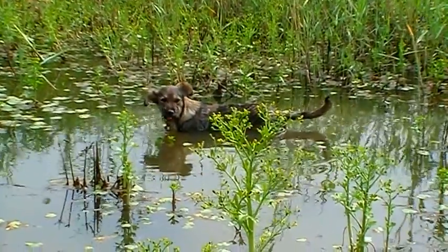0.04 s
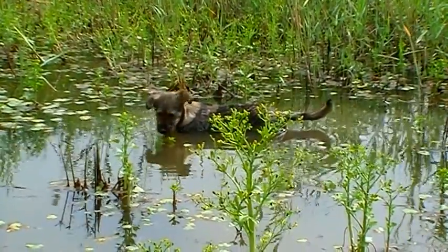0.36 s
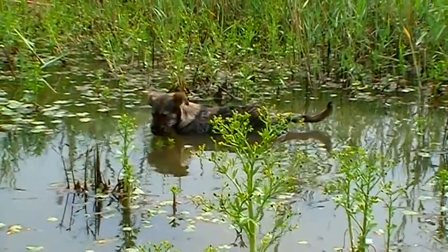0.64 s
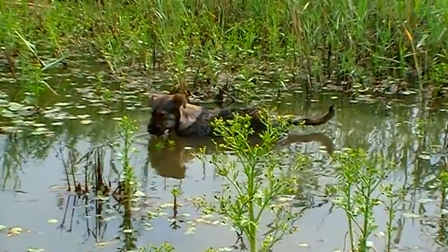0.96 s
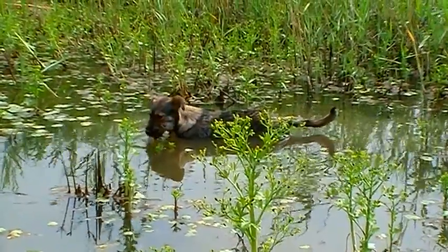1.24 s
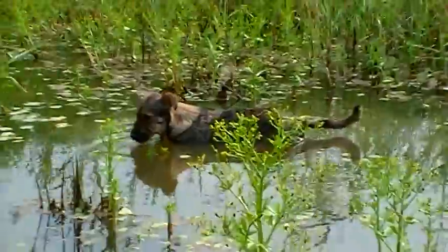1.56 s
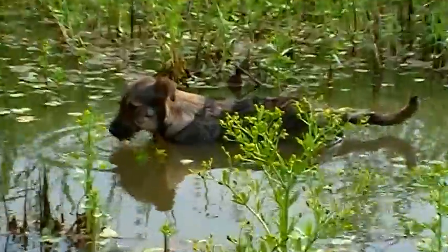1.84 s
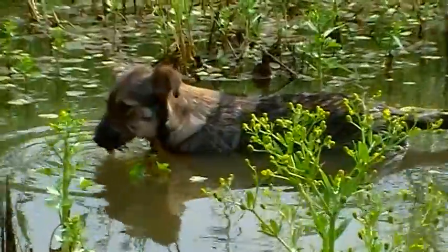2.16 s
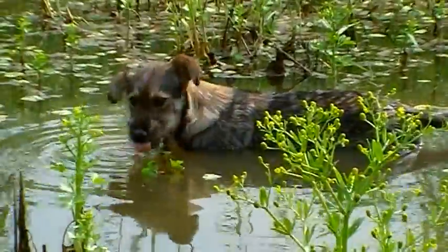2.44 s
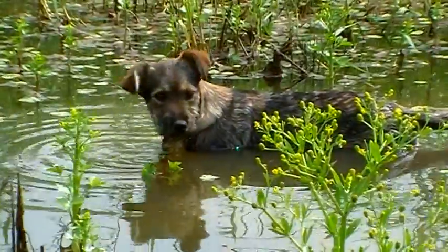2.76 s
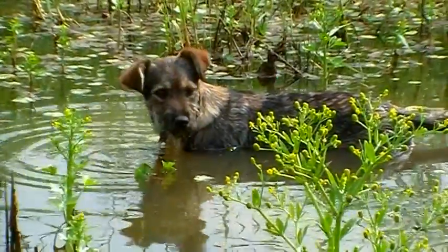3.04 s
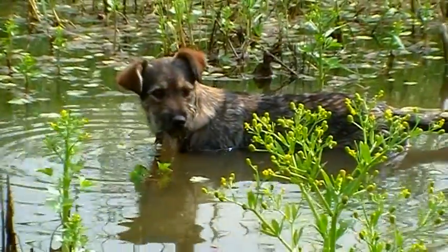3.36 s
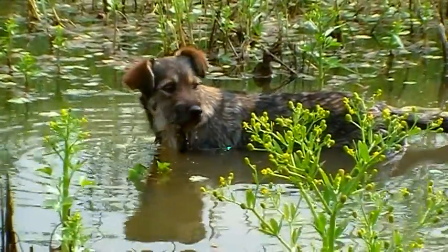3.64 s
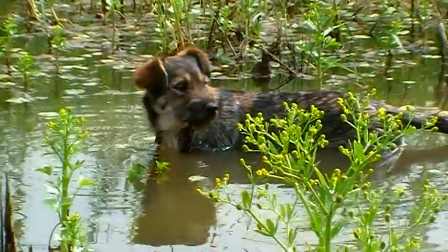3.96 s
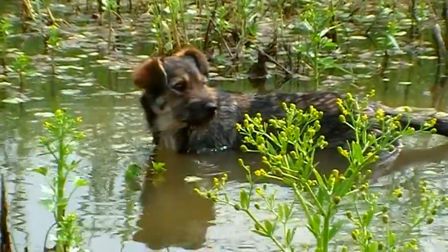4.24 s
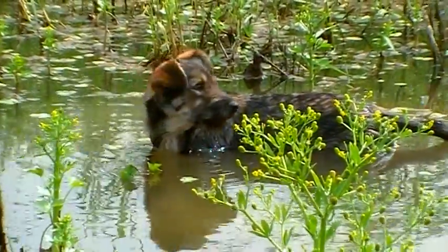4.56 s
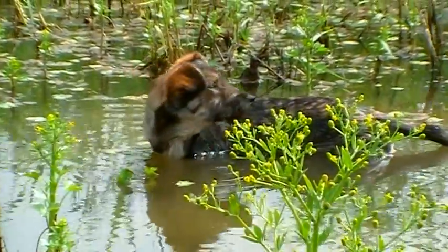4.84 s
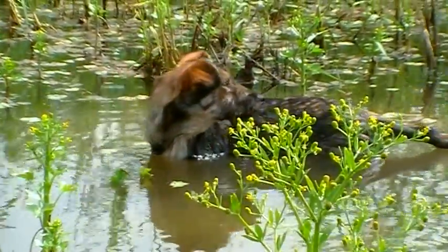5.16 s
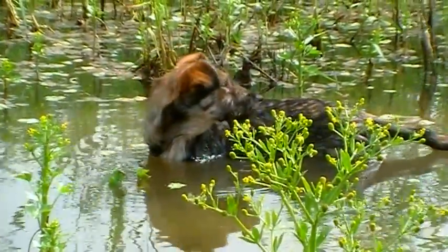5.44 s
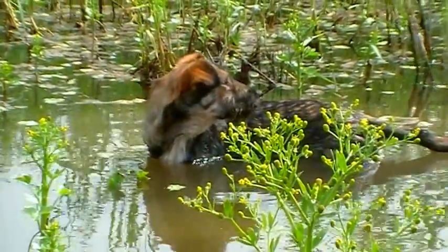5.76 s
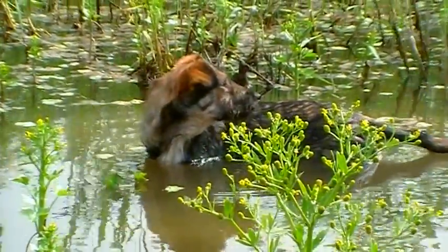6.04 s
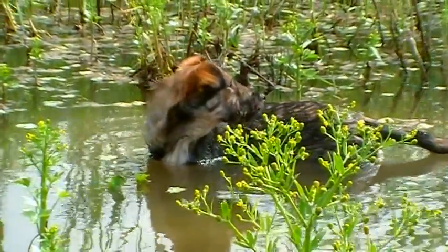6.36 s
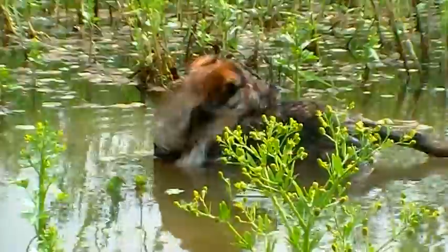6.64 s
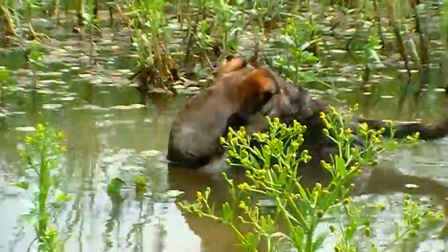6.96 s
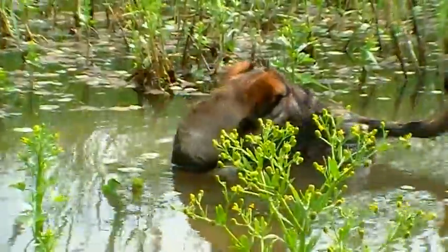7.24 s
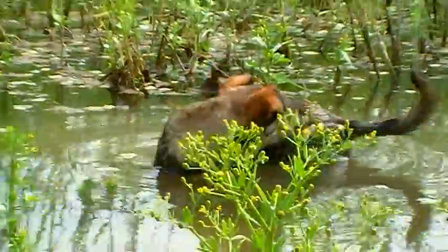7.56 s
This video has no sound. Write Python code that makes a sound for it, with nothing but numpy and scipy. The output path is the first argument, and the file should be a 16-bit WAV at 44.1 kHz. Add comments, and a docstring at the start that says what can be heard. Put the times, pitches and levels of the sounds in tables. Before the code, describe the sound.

Outdoors by a marsh, a songbird chatters in short phrases over a constant hiss. It starts with scratchy rasps, moves to high whistles and a quick run of chips, then returns to rasping and churring. Early on, gentle wind bumps the microphone and there is one dry click. Later a distant low drone and a soft rustle creep in behind the bird.

```python
"""In the reeds of a marsh a warbler sings: grating rasps, whistles, chips and a soft stutter, mostly in pairs.
Membranes in its syrinx modulate the airflow, its throat filters the tone, and the stems scatter it.
Behind it lies a steady hiss; toward the end a low drone and a soft rustle come up.
Light puffs of air press on the microphone, and the camera clicks once."""
import sys
import numpy as np
from scipy import signal
from scipy.fft import rfft, irfft
from scipy.io import wavfile
from scipy.ndimage import uniform_filter1d

SR = 44100
rng = np.random.default_rng(int(sys.argv[2]) if len(sys.argv) > 2 else 0)


def dump(signal):
    """Clip the signal to [-1, 1] and save it as 16-bit WAV at the path in sys.argv[1]."""
    limited = np.clip(np.atleast_2d(signal).T, -1, 1)
    pcm = np.round(limited * 32767).astype(np.int16)
    wavfile.write(sys.argv[1], SR, pcm)


N = 339570
TIME, BINS = np.arange(N) / SR, np.fft.rfftfreq(N, 1 / SR)


def amp(db):
    """Amplitude ratio of a level in decibels."""
    return 10 ** (np.asarray(db) / 20)


def unit(x):
    """Normalisation to rms 1."""
    return x / np.sqrt(np.mean(x ** 2) + 1e-20)


def at_frequency(points, hz=BINS):
    """Interpolation on a logarithmic frequency axis."""
    f, value = np.transpose(points)
    return np.interp(np.log(hz + 1), np.log(f + 1), value)


def envelope(curve):
    """Amplitude envelope, linear in decibels between breakpoints."""
    return amp(np.interp(TIME, *np.transpose(curve)))


def gaussian(x, centre, width):
    """Gaussian pulse of height 1."""
    return np.exp(-((x - centre) / width) ** 2)


def wander(rate_hz):
    """Random modulation: low-pass noise of rms 1."""
    return unit(irfft(rfft(rng.standard_normal(N)) * gaussian(BINS, 0, rate_hz), N))


def correlated(left, independent, coherence):
    """Partial coherence: the right channel is part left channel, part independent signal."""
    return coherence * left + np.sqrt(1 - coherence ** 2) * independent


def noise(spectrum, coherence, lead_rad=0):
    """Spectral shaping of two partly coherent channels of white noise."""
    left, independent = rfft(rng.standard_normal((2, N)))
    right = correlated(left, independent, coherence) * np.exp(-1j * lead_rad)
    return unit(irfft(np.array([left, right]) * amp(at_frequency(spectrum)), N))


# Spectrum of the hiss: f/Hz, relative level/dB
HISS_SPECTRUM = [(15, -52), (28, -28), (55, -9), (99, -5.5), (183, -6), (566, -8.5), (848, -3.5), (970, -5),
                 (1570, -6), (1710, -4), (2700, -6), (3930, -5), (4490, -9), (7490, -4.5), (11500, -16.5),
                 (15500, -39)]
# The hiss eases and partly returns: t/s, relative level/dB
HISS_ENVELOPE = [(2.5, -58.7), (4.2, -60.6), (5.3, -60.6), (5.8, -59.7)]
# Likeness of the channels: f/Hz, signed coherence
HISS_COHERENCE = [(60, -0.71), (130, -0.46), (290, -0.24), (640, -0.012), (1400, 0.75), (3100, 0.74),
                  (6800, 0.82), (9500, 0.29), (15000, 0.31)]
# Lead of the left channel: f/Hz, phase/rad
HISS_LEAD = [(300, -0.097), (700, -0.43), (3000, 0.23), (7500, 0.032), (9200, 0.69), (11500, 1.9),
             (15000, -0.12)]


def hiss(gain_db=12, flicker_db=0.75):
    """Broadband noise whose coherence depends on frequency; its level flickers slightly."""
    band = noise(HISS_SPECTRUM, at_frequency(HISS_COHERENCE), at_frequency(HISS_LEAD))
    return band * envelope(HISS_ENVELOPE) * amp(gain_db + flicker_db * wander(27))


# Spectrum of the drone: f/Hz, relative level/dB
DRONE_SPECTRUM = [(25, -65), (80, -17), (130, -8), (200, -1), (300, -0.5), (450, -8.5), (700, -9.5),
                  (1500, -45)]
# The drone creeps in, rises and holds: t/s, level/dB
DRONE_ENVELOPE = [(0, -75.5), (4.95, -64), (5.9, -55.5)]


def drone():
    """Low-frequency noise, nearly coherent in the two channels, heard as a distant drone."""
    return noise(DRONE_SPECTRUM, coherence=0.94) * envelope(DRONE_ENVELOPE)


# Spectrum of the rustle: f/Hz, relative level/dB
RUSTLE_SPECTRUM = [(30, -70), (400, -28), (800, -4), (1300, -1), (2200, -1.5), (3100, -3), (4000, -17.5),
                   (8000, -11), (14000, -40)]
# Its two swells: t/s, rise/dB, half width/s
RUSTLE_SWELLS = [(6.2, 4.5, 0.54), (7.32, 5, 0.12)]


def rustle(start_db=-58, growth_db_per_s=1.12, flicker_db=0.88):
    """Amplitude-modulated mid-band noise: a rustle that grows slowly and swells twice."""
    band = noise(RUSTLE_SPECTRUM, coherence=0.88)
    swells_db = sum(db * gaussian(TIME, s, width) for s, db, width in RUSTLE_SWELLS)
    return band * amp(start_db + growth_db_per_s * TIME + swells_db + flicker_db * wander(25))


# Pressure spectrum of the eddies: f/Hz, relative level/dB
PUFF_SPECTRUM = [(25, -32), (70, -8.5), (130, 1.5), (230, -3.5), (330, -4), (600, -29), (1500, -55)]
# The stronger puffs: t/s, relative level/dB, duration/s
PUFFS = [(0.008, -46.5, 0.066), (0.193, -44.5, 0.07), (0.315, -52, .042), (0.366, -49, 0.085),
         (.586, -55, .1), (2.299, -46, 0.062), (2.365, -49.5, 0.087), (3.338, -53, 0.076),
         (3.4, -45, 0.036), (3.727, -49.5, 0.3), (3.837, -51, 0.035)]


def puffs(gain_db=1, spacing_s=0.55, calm_at_s=4.8, faint_db=-62, faint_length_s=0.14):
    """Turbulent pressure: eddies thump the two microphone ports, largely in antiphase."""
    push, turbulence = np.zeros(N), noise(PUFF_SPECTRUM, coherence=-0.83)
    slots = np.arange(0, calm_at_s, spacing_s)
    faint_eddies = [(s + spacing_s * rng.random(), faint_db, faint_length_s) for s in slots]
    for s, db, length in PUFFS + faint_eddies:
        start, swell = round(s * SR), unit(np.hanning(int(length * SR)))
        push[start:start + len(swell)] += amp(db + gain_db) * swell
    return push * turbulence


# Spectrum of the tick: f/Hz, relative level/dB
CLICK_SPECTRUM = [(150, -42), (450, -6), (750, -4), (1050, 3.5), (1380, -2), (1750, -17), (2700, -6),
                  (3500, -17), (4900, -1.5), (7900, -6), (9400, -13), (15000, -46.5)]


def camera_click(at_s=2.0302, half_width_s=0.0014, db=-25):
    """A broadband transient: one dry tick on the camera body."""
    burst = amp(db) / np.sqrt(1 + ((TIME - at_s) / half_width_s) ** 4)
    return burst * noise(CLICK_SPECTRUM, coherence=0.2)


def scattered(sound, t60_s, coherence, count):
    """Scattering: many stems return echoes at random delays, with exponential decay."""
    delay = rng.uniform(0.002, t60_s, (2, count))
    echoes = rng.choice([-1., 1.], delay.shape) * amp(-60 * delay / t60_s)
    response = np.zeros((2, N))
    np.put_along_axis(response, (delay * SR).astype(int), echoes, axis=1)
    response /= np.linalg.norm(response, axis=1, keepdims=True)
    response[1] = correlated(response[0], response[1], coherence)
    return signal.fftconvolve(sound[None], response[:, :SR], axes=1)[:, :N]


def syrinx(hz, slope_db, fundamental_db):
    """Harmonic series of four partials; the throat favours the second, which sounds at hz."""
    phase = np.pi * np.cumsum(hz) / SR
    gains = amp([fundamental_db, 0, slope_db, 2 * slope_db])
    return np.sqrt(2) * sum(gain * np.sin(k * phase) for k, gain in enumerate(gains, 1))


def rattle(rate_hz, jitter, decay_cycles, uneven_db):
    """Pulse modulation: the membranes open in uneven, rounded pulses, each dying before the next."""
    cycles = np.cumsum(rate_hz * np.exp(jitter * wander(120.3))) / SR
    pulses = np.exp(-(cycles % 1) / decay_cycles)
    rounded = uniform_filter1d(pulses, size=int(0.33 * SR / rate_hz))
    return unit(rounded * amp(uneven_db * wander(70)))


def airflow_catches(rate_hz=58, width_cycles=0.21, depth=0.96, jitter=0.16, uneven_db=1.5):
    """Gating: the airflow catches for a moment between groups of three or four pulses."""
    cycles = np.cumsum(rate_hz * np.exp(jitter * wander(40.5))) / SR
    gate = 1 - depth * gaussian(cycles % 1, 0.5, width_cycles)
    return gate * amp(uneven_db * wander(38))


# One short falling note; columns as for the syllables below
PIP = [(.001, 0.007, 2190, 1790, -41, .06, -13.5)]
# Even runs of pips: t/s, duration/s, spacing/s, mid-run pitch factor, mid-run gain/dB
STUTTERS = [(0.372, .07, 0.018, 1.1, -4), (4.602, .175, .0314, 1.02, -3.5)]


def stutters(edge_pitch=0.93, edge_db=-1):
    """Periodic repetition: song rows of pips, highest and loudest in the middle of each run."""
    rows = []
    for s, length, spacing, pitch, db in STUTTERS:
        onsets = s + np.arange(0, length, spacing)
        for onset, edge in zip(onsets, np.linspace(-1, 1, len(onsets)) ** 2):
            rows.append((onset, PIP, pitch * edge_pitch ** edge, db + edge_db * edge))
    return rows


# Syllables before transposition, one row a note: delay/s, duration/s, first f/Hz, last f/Hz,
# relative level/dB, roughness (fractional pitch scatter), overtone slope/dB per harmonic
SQUEAK = [(0, 0.0086, 4920, 5400, -44, 0.085, -23), (.006, .028, 5680, 5950, -48.5, .012, -11),
          (0.022, .035, 2950, 2930, -55, .006, -3)]
WHISTLE = [(0, 0.054, 6300, 6550, -43.5, .014, -25), (.01, 0.044, 5290, 5510, -44.5, 0.116, -22),
           (.012, .052, 2835, 2880, -52, 0.022, 0), (.03, .048, 1700, 1960, -52.5, .012, -15),
           (.031, .027, 5640, 4730, -39, 0.096, -18), (.05, .07, 3780, 3830, -43, 0.039, -20),
           (.064, 0.02, 3785, 3900, -33, .01, -25), (.137, .047, 5740, 5830, -43.5, .011, -25)]
WARBLE = [(0, 0.0397, 5630, 6200, -37, 0.019, -23), (.015, 0.031, 5690, 5540, -41, 0.16, -23),
          (.035, .048, 4130, 3820, -35.5, .012, -22), (.08, .054, 3030, 2872, -44, .016, -0.5)]
CHIP = [(0, 0.0075, 3370, 3290, -38, 0.18, -11.5), (.008, .0194, 3252, 3432, -42, 0.18, -17),
        (.02, 0.012, 3227, 2910, -42, 0.304, -8), (.024, .021, 2919, 2920, -30.5, .065, -27),
        (.039, .045, 2950, 2763, -46.5, .12, -27)]
CHURR = [(0, 0.0272, 2300, 3240, -36, .16, -25), (.024, .034, 3950, 3650, -37, 0.175, -16),
         (.034, 0.0238, 2880, 2620, -31, 0.039, -23), (.052, 0.02075, 2450, 2640, -39.5, .14, -10),
         (.05, .06, 4200, 4130, -53, .05, -25)]
SLUR = [(0, .035, 4200, 4750, -53, .02, -25), (.028, .065, 4650, 3650, -49, .02, -25)]
CROAK = [(0, 0.012, 2130, 2040, -45, .087, -18), (.017, .018, 2140, 2120, -37.5, 0.16, -26),
         (.048, .016, 1950, 2150, -46, .1, -16), (.062, .019, 2166, 2056, -34, .027, -22)]
WHEEZE = [(0, 0.062, 4750, 4570, -55, 0.034, -3.5), (0, .05, 5700, 5690, -50.5, 0.22, -15)]
# Sequence of syllables: t/s, syllable, pitch factor, gain/dB
SONG = [(.489, SQUEAK, 1, 0.5), (1.528, WHISTLE, 1, -1), (1.812, WHISTLE, .995, .5),
        (2.552, WARBLE, 1, -.5), (2.761, WARBLE, 0.98, -2.5), (3.068, CHIP, 1.023, 0),
        (3.214, CHIP, 1.014, -.5), (3.452, CHIP, .99, -3), (3.602, CHIP, .96, -1), (3.857, CHIP, .99, -1.5),
        (4.005, CHIP, .99, -2), (4.229, SLUR, .99, -6), (4.946, CROAK, 0.98, -1),
        (5.727, WHEEZE, .95, -1.5), (6.542, CHURR, 0.97, 0), (6.679, CHURR, 0.97, -1)]
# Strength of the fundamental: second harmonic's f/Hz, level/dB relative to that harmonic
FUNDAMENTAL = [(2000, -20), (2700, -15.5), (2950, -34), (3400, -10), (3800, -19), (5200, -21), (6000, -6),
               (6500, -11)]


def syllables(arch=0.018, flutter=3.3, taper=0.37):
    """Frequency modulation: each note is an arched glide; the rougher it is, the more it rattles."""
    out, chaos = np.zeros(N), np.tanh(wander(900))
    pulses = rattle(rate_hz=300, jitter=0.3, decay_cycles=0.42, uneven_db=6.5)
    for s, notes, pitch, gain_db in SONG + stutters():
        for delay, length, first_hz, last_hz, db, roughness, slope_db in notes:
            on = (TIME >= s + delay) & (TIME < s + delay + length)
            progress = np.linspace(0, 1, on.sum())
            glide_hz = pitch * (first_hz + (last_hz - first_hz) * progress)
            bend = 1 + arch * (np.sin(np.pi * progress) - 0.5) + roughness * chaos[on]
            tone = syrinx(glide_hz * bend, slope_db, at_frequency(FUNDAMENTAL, last_hz))
            grain = pulses[on] ** np.clip(flutter * roughness, 0, 1)
            swell = unit(signal.windows.tukey(len(tone), taper) * grain)
            out[on] += amp(db + gain_db) * swell * tone
    return out


def rasp_effort(t, length, crescendo_db, sag_db, sag_at, attack_s=0.021, release_s=0.023):
    """Level envelope of a rasp in dB: two surges of effort with a sag between them."""
    attack = -5.5 * np.clip(1 - t / attack_s, 0, 1)
    release = -13.5 * np.clip(1 - (length - t) / release_s, 0, 1)
    sag = sag_db * gaussian(t, sag_at * length, width=0.011)
    return attack + release + crescendo_db * (t / length - 0.5) - sag


# Resonances of the throat: f/Hz, gain/dB
THROAT_RESPONSE = [(600, -27), (1150, -4), (1500, -11), (1900, 0.5), (2600, -2.5), (3100, -1.5),
                   (3550, -3.5), (4000, -3), (4700, -8.5), (8000, -5), (14000, -43)]
# Rasps: t/s, duration/s, relative level/dB, crescendo/dB, sag/dB, place of the sag (0-1),
# first f/Hz, last f/Hz, final roughness (fractional pitch scatter)
RASPS = [(-.012, 0.1, -38, -3, 10, 0.55, 2300, 2337, 0.18),
         (0.202, 0.1, -38.5, -1, 16, 0.63, 2177, 2336, 0.15),
         (.774, 0.13, -33.5, 3.5, -0.5, 0.66, 2597, 2503, 0.167),
         (.977, .161, -33, 3.5, 10, .73, 2524, 2737, 0.16),
         (1.26, .139, -34.5, 4.5, 4, 0.64, 2476, 2798, 0.15),
         (2.162, .109, -33, 6, 2.5, 0.55, 2506, 2598, 0.093),
         (2.341, 0.13, -35.5, 0, 2, 0.47, 2530, 2637, 0.072),
         (5.229, .102, -35.5, 8.5, 13, 0.51, 2260, 2164, 0.1),
         (5.429, 0.097, -34, 7.5, 10, 0.49, 2150, 2290, 0.086),
         (6.003, .14, -31.5, 5.5, 6, 0.58, 2432, 2600, 0.13),
         (6.238, 0.14, -32, 3, 5, 0.66, 2512, 2702, 0.11)]


def rasps(start_roughness=0.216, settle_at=0.46, settle_span=0.16, end_rattle=0.48, gain_db=1, air_db=-12):
    """Source and filter: a rattling, chaotic tone and a rush of air pass through the throat."""
    out, chaos = np.zeros(N), np.tanh(wander(705))
    pulses = rattle(rate_hz=190, jitter=0.17, decay_cycles=0.4, uneven_db=1) * airflow_catches()
    air = amp(air_db) * rng.standard_normal(N)
    for s, length, db, crescendo_db, sag_db, sag_at, first_hz, last_hz, end_roughness in RASPS:
        on = (TIME >= s) & (TIME < s + length)
        t = TIME[on] - s
        # Partway through, the pitch steadies and the rattle softens: some rasps narrow toward a tone.
        settled = np.clip((t / length - settle_at) / settle_span, 0, 1)
        roughness = start_roughness + (end_roughness - start_roughness) * settled
        grain = unit(pulses[on] ** (1 + settled * (end_rattle - 1)))
        glide_hz = first_hz + (last_hz - first_hz) * t / length
        tone = syrinx(glide_hz * (1 + roughness * chaos[on]), slope_db=-16, fundamental_db=-14)
        effort = amp(db + gain_db + rasp_effort(t, length, crescendo_db, sag_db, sag_at))
        out[on] += effort * signal.windows.tukey(len(t), 0.04) * grain * (tone + air[on])
    return irfft(rfft(out) * amp(at_frequency(THROAT_RESPONSE)), N)


def warbler(reeds_db=-3.5, bank_db=-17, pan_db=1.5, lag_s=12e-6):
    """Time and level differences place the bird a little to the left; echoes follow the direct sound."""
    song = rasps() + syllables()
    delayed = irfft(rfft(song) * np.exp(-2j * np.pi * BINS * lag_s), N)
    near_reeds = amp(reeds_db) * scattered(song, t60_s=0.19, coherence=0.85, count=260)
    far_bank = amp(bank_db) * scattered(song, t60_s=0.55, coherence=1.0, count=900)
    return (np.array([song, delayed]) + near_reeds + far_bank) * amp([[pan_db], [-pan_db]])


def scene():
    """Superposition of the bird, the marsh background and the small noises at the camera."""
    return warbler() + hiss() + drone() + rustle() + puffs() + camera_click()


def record(dry):
    """Band limiting by a linear-phase low-pass filter."""
    lowpass = signal.firwin(511, cutoff=15700, window=("kaiser", 9), fs=SR)
    return signal.oaconvolve(dry, lowpass[None], "same")


dry = scene()
out = record(dry)
dump(out)
```